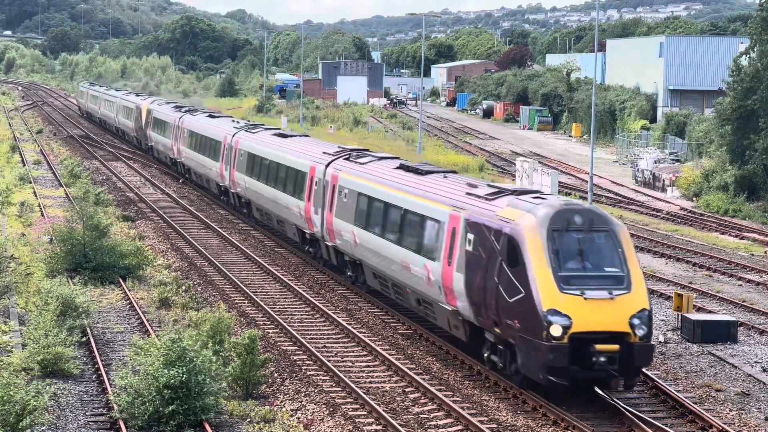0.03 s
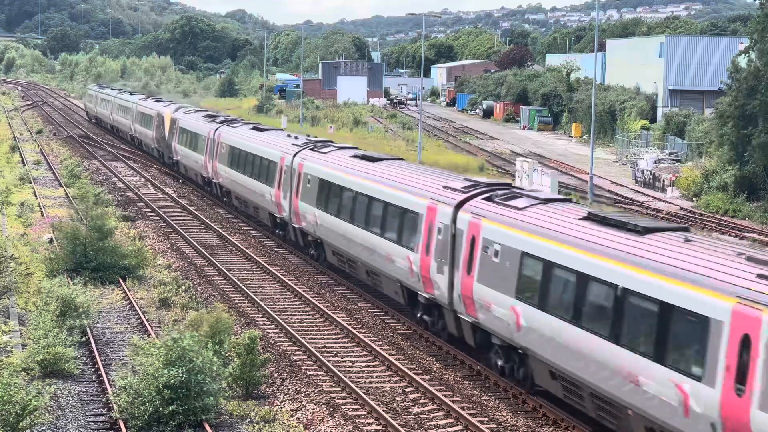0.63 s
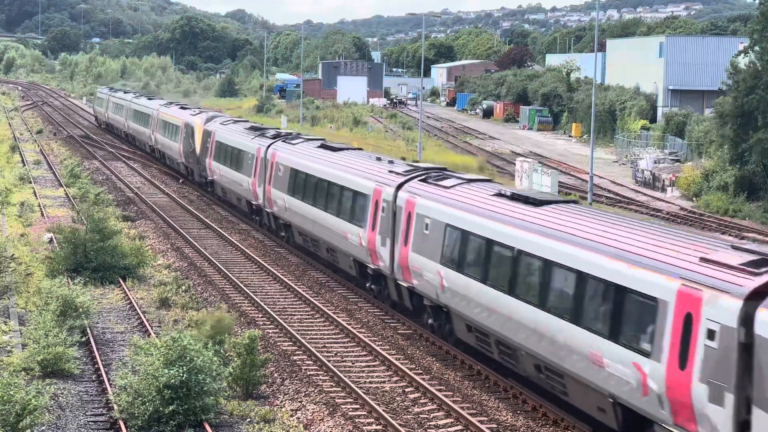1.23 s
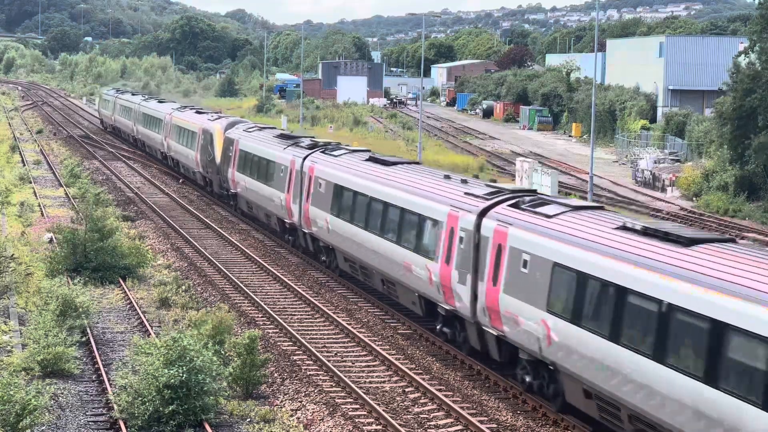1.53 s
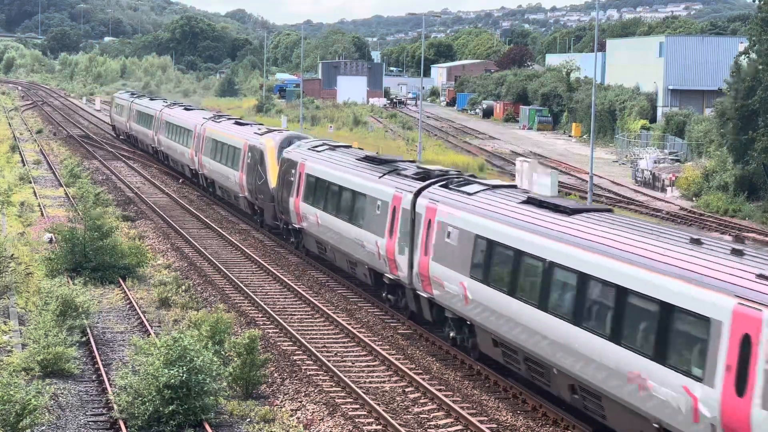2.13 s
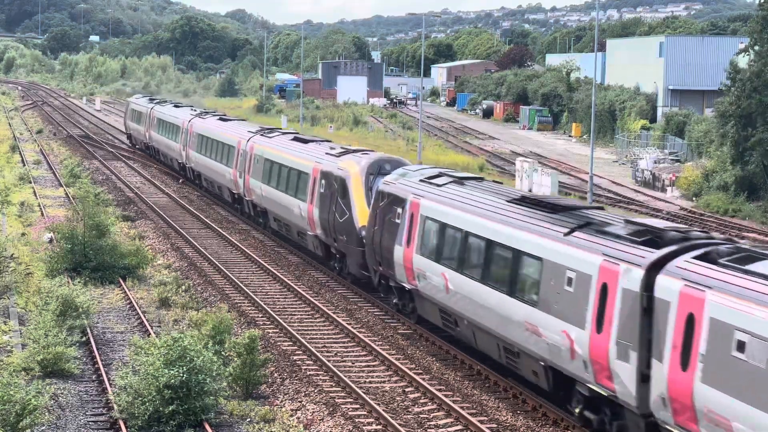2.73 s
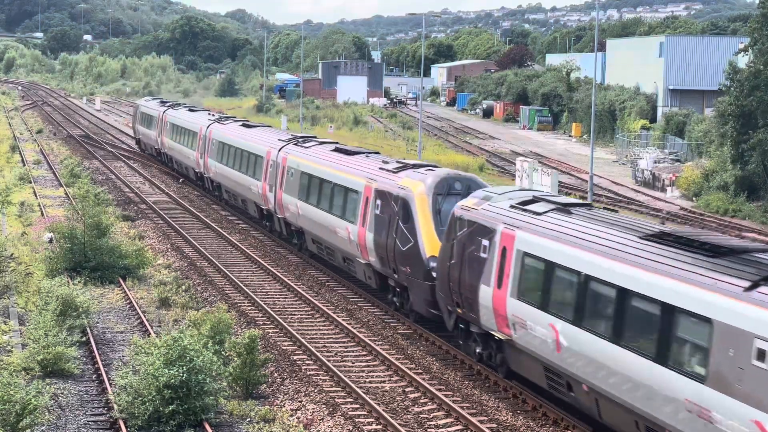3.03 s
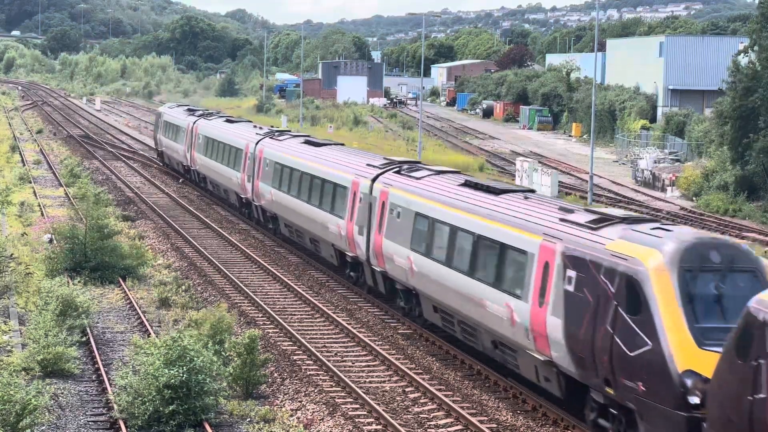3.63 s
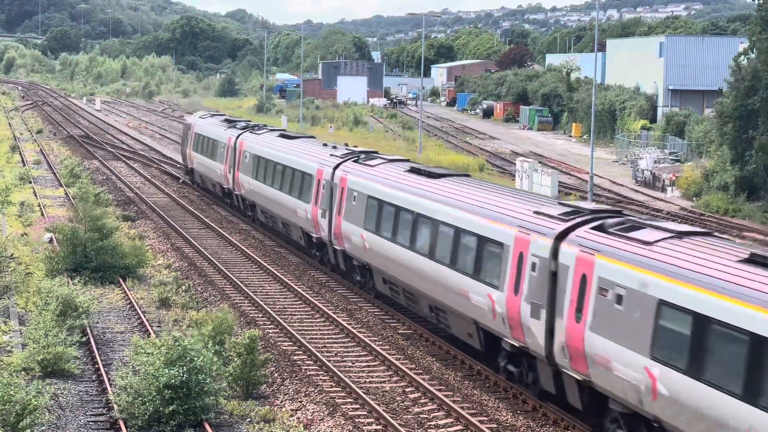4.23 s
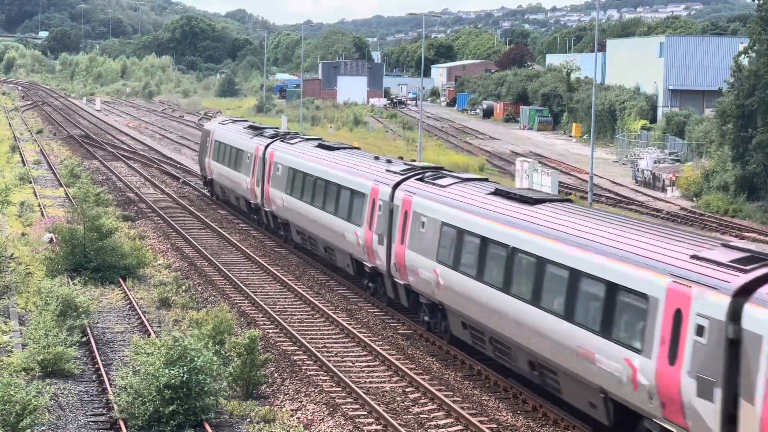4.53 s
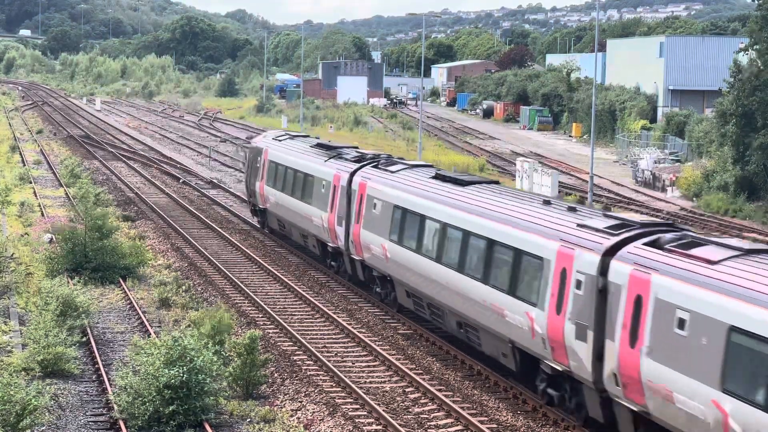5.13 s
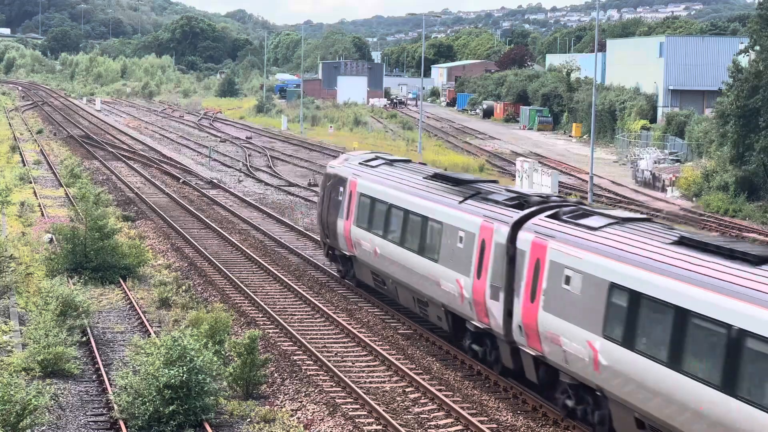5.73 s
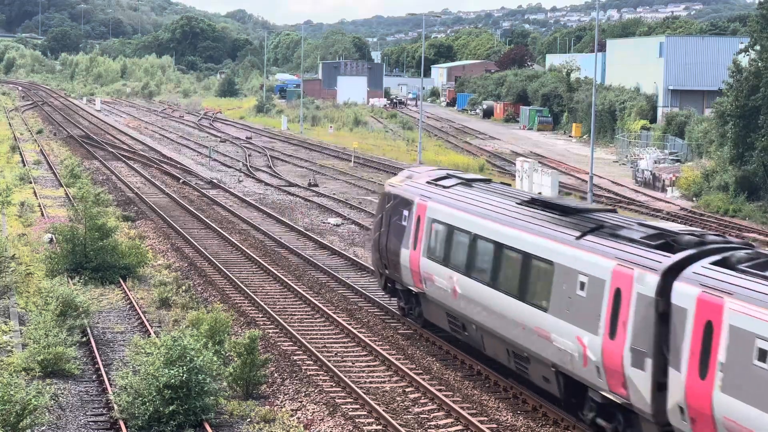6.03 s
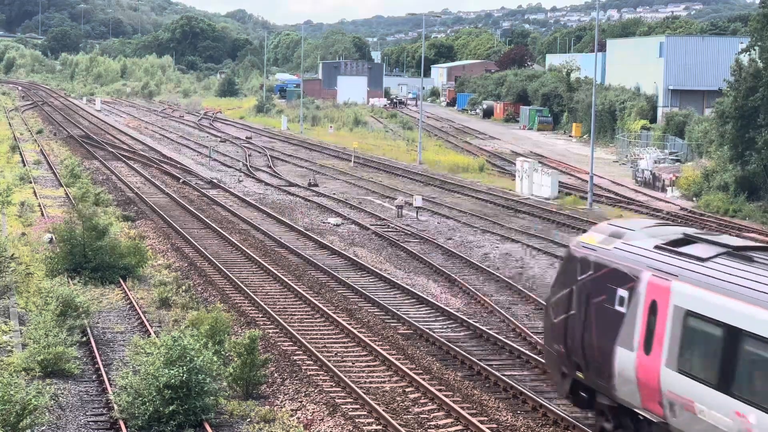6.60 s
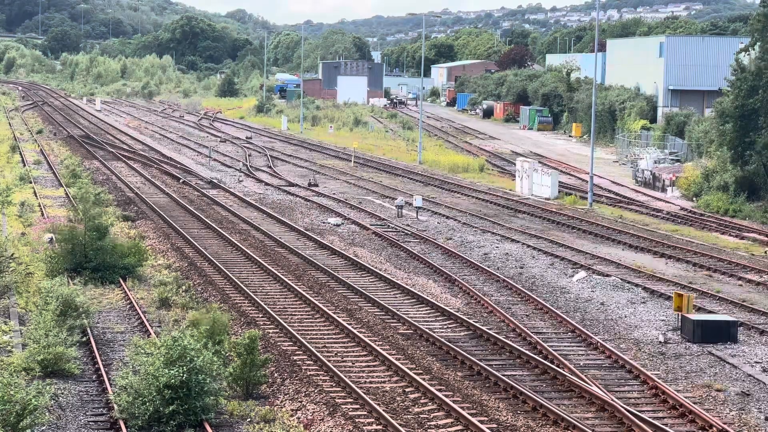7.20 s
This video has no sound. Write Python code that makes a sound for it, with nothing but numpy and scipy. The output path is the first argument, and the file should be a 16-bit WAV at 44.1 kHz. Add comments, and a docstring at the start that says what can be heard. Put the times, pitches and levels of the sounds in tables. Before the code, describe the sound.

A diesel passenger train passes at speed, heard outdoors close to the tracks. A rolling roar and low rumble build within the first half second, with a brief rush of air and a few heavy thuds. Wheels clack over gaps in the rails in quick groups, mostly of four, all the way through, hardest from about 1 to 2 seconds, where hollow booms sound under the cars. A low, throbbing engine drone swells around 1.8 seconds and returns in waves. From about 1.5 seconds, high turbocharger whistles come roughly every 0.8 seconds, each sinking in pitch, amid hissing air and faint, thin wheel squeals. At about 6.6 seconds a gust of hiss marks the tail of the train, and the last engine drops in pitch. The final knocks come just after 7 seconds as the roar and drone begin to fall away.

```python
"""Above a railway junction, a diesel train runs past at speed.
Rough wheels make the ground rumble and the cars and rails roar, while air hisses along the train.
Every car has an engine that drones and a turbocharger that whistles, sinking in pitch as it goes by.
Over it all, the axles knock across the gaps in the rails in quick groups, mostly of four."""
import sys
import numpy as np
from scipy.fft import rfft, irfft, next_fast_len
from scipy.io import wavfile
from scipy.ndimage import uniform_filter1d, minimum_filter1d

SR = 44100
rng = np.random.default_rng(int(sys.argv[2]) if len(sys.argv) > 2 else 0)


def wav_record(signal):
    """Record a signal, one row per channel, as 16-bit PCM in the file named by sys.argv[1]."""
    frames = np.transpose(np.atleast_2d(signal))
    bounded = np.clip(frames, -1, 1)
    # unit amplitude maps onto the largest positive 16-bit level
    quanta = np.round(bounded * 32767).astype(np.int16)
    wavfile.write(sys.argv[1], SR, quanta)


N = 324576
TIME = np.arange(N) / SR
SPEED_M_S, TRACK_DISTANCE_M, SOUND_M_S = 27.5, 19.0, 343

# rumble of the ground: t/s, level/dB
GROUND_LEVELS = [(0, -40), (0.26, -28), (0.5, -33), (1.1, -37.5), (1.62, -35), (2.2, -32), (2.45, -28),
                 (2.72, -34), (2.98, -23.5), (3.35, -31.5), (3.85, -30), (4.03, -27), (4.22, -29),
                 (4.7, -26.5), (5.35, -26), (5.85, -28.5), (6.05, -25), (6.3, -30), (6.7, -24), (6.9, -31),
                 (7.1, -26), (7.36, -32)]
# wheels rolling on the rails: t/s, car body level/dB, rail level/dB
ROLLING_LEVELS = [(0, -36.5, -36.5), (0.15, -20, -36), (0.3, -21.5, -31.5), (0.55, -23.5, -34.5),
                  (0.9, -19, -26.5), (1.15, -21.5, -28), (1.45, -19.5, -28), (1.95, -17.5, -26.5),
                  (2.25, -21, -30), (2.8, -19.5, -27.5), (3.15, -19.5, -31), (3.55, -20.5, -31),
                  (4.1, -21.5, -35), (4.35, -22, -33), (5.7, -22.5, -33), (6.05, -23.5, -31.5),
                  (6.95, -24, -33.5), (7.36, -27, -39.5)]
# tone colours (how strong each pitch is) of ground, car bodies and rails: f/Hz, level/dB
GROUND_COLOUR = [(25, -11), (34, -4), (48, 11), (70, 15), (100, 8.5), (140, 9), (250, -16)]
BODY_COLOUR = [(70, -12), (120, -3.5), (180, 3.5), (280, 0.5), (400, -3.5), (600, -13.5), (1200, -23)]
RAIL_COLOUR = [(300, -1), (500, 2.5), (800, 2.5), (1100, -1.5), (1450, -6), (1800, -6.5), (2200, -10),
               (3000, -13), (4500, -24.5), (8000, -53)]
# air along the cars: t/s, rush level/dB, high hiss level/dB
AIR_LEVELS = [(0, -56, -72), (0.3, -41.5, -70), (0.55, -47.5, -70), (0.92, -39, -64), (1.3, -39.5, -46),
              (1.55, -40, -48), (1.8, -36.5, -44), (2.3, -40, -45), (2.92, -37, -39), (3.35, -37.5, -45),
              (4.08, -46.5, -47), (4.3, -43.5, -54), (4.9, -41.5, -52), (5.7, -41, -49), (6.1, -35.5, -42),
              (6.55, -39.5, -49), (6.8, -40, -52), (7.36, -48, -55)]
# gusts at the nose, joined cabs and tail: peak t/s, rush level/dB, high hiss level/dB, build-up/s
GUSTS = [(0.32, -36.5, -57, 0.034), (3.38, -44, -39, 0.55), (6.62, -32.5, -37.5, 0.45)]
# tone colours of the rush and the high hiss: f/Hz, level/dB
RUSH_COLOUR = [(2000, 1.5), (3500, 1), (5000, 1), (6200, 1.5), (8200, 2.5), (9800, -25), (11200, 0.5),
               (12500, -10)]
HISS_COLOUR = [(7500, -14), (9500, -4), (10200, -8), (11300, 0), (12200, -2), (13000, -4), (15700, -5)]
# hollow booms of the frames under the cars: peak t/s, swell/s, f/Hz, width/Hz, level/dB
BOOMS = [(0.9, 0.08, 245, 22, -24), (1.1, 0.08, 285, 16, -21.5), (1.09, 0.12, 365, 24, -22.5),
         (1.55, 0.65, 470, 30, -27.5), (1.75, 0.3, 305, 22, -26.5), (5.05, 0.12, 365, 25, -25)]
# thin wheel squeals: t/s, f/Hz, level/dB
SQUEALS = [(1.05, 15000, -56), (1.28, 14700, -53), (1.41, 14250, -51), (1.97, 14250, -54),
           (2.2, 14300, -54), (3.62, 14200, -57), (3.86, 14200, -54), (4.7, 13880, -51), (4.9, 13350, -54),
           (5.18, 14110, -55)]
# exhaust of the oncoming engines and the last one: t/s, firing f/Hz, base level/dB, octave level/dB
ONCOMING_ENGINES = [(0, 94.2, -30, -34), (0.62, 96, -38.5, -48), (1.2, 97.3, -28, -33),
                    (1.55, 98.5, -50, -23), (1.82, 97.8, -17.5, -13), (2.1, 95, -35, -24.5),
                    (2.5, 95.8, -20.5, -17), (2.75, 95, -21, -30), (3.05, 94.5, -33, -25),
                    (3.33, 95.8, -14, -28), (3.87, 95.4, -19.5, -16), (4.15, 96.7, -33, -26),
                    (4.75, 94.5, -25, -43), (5.1, 95.7, -24, -37), (5.8, 94.6, -21, -29),
                    (6.25, 95.53, -32, -34), (7.1, 94.5, -18, -23.5), (7.36, 93.1, -39, -26)]
LAST_ENGINE = [(6.0, 94.5, -72, -70), (6.5, 91.2, -18.5, -29), (6.8, 86.1, -20, -15.5),
               (7.0, 84.8, -29, -28), (7.36, 82.85, -48, -40)]
# passing cars: turbo peak t/s, engine level/dB, turbo f/Hz at rest, turbo level/dB, approach/s
CARS = [(1.602, -28.5, 7800, -29.5, 0.31), (2.36, -37, 7740, -32.5, 0.22), (3.22, -29, 7960, -29, 0.42),
        (3.981, -36, 7920, -35, 0.31), (4.92, -36, 8560, -29.5, 0.43), (5.7, -44, 8250, -32.5, 0.36),
        (6.5, -28.5, 7838, -38, 0.57), (7.2, -37, 8720, -35.5, 0.46)]
# bumps of loose sleepers, the beams under the rails: t/s, f/Hz, level/dB
SLEEPER_BUMPS = [(0.22, 200, -4), (0.595, 220, -10), (1.186, 420, -6), (1.436, 230, -7), (1.617, 280, -7),
                 (2.009, 330, -7), (2.092, 230, -8), (2.182, 480, -11), (2.256, 380, -10), (2.445, 240, -7),
                 (3.911, 130, -7), (4.278, 220, -10), (4.658, 140, -8), (4.837, 240, -11), (4.94, 190, -6),
                 (4.964, 150, -7), (5.006, 250, -10), (5.319, 170, -8), (5.464, 170, -8), (5.622, 200, -9),
                 (6.738, 130, -6), (7.005, 260, -8), (7.116, 130, -5), (7.275, 230, -13)]
# notes of a bogie, the frame that holds the wheels: f/Hz, level/dB, time to fade by 60 dB/s
BOGIE_NOTES = [(215, -1, .2), (270, -1, .18), (370, -6, .13), (470, -1, .15), (620, -4, .1), (900, -2, .06),
               (1230, -2, .045)]
# axles hitting the gaps: t/s, clack level/dB, thud level/dB, crack level/dB
AXLE_HITS = [(0.072, -16.5, -18, -30.5), (0.152, -19.5, -20, -33.5), (0.204, -17, -11, -30),
             (0.2135, -13, -9, -20.5), (0.291, -28, -21, -31), (0.301, -26, -8, -31),
             (0.317, -23, -19, -32), (0.355, -19.5, -17, -30), (0.606, -28, -14.5, -29.5),
             (0.668, -19.5, -27, -36), (0.797, -19.5, -16.5, -32), (0.872, -29, -15, -31),
             (0.93, -18.5, -12, -27.5), (1.045, -19, -13.5, -29.5), (1.125, -14.5, -8, -29),
             (1.153, -10.5, -18, -22.5), (1.235, -7.5, -14, -21), (1.314, -14.5, -17, -23),
             (1.397, -14, -16, -25), (1.496, -22, -32, -36), (1.73, -11.5, -16, -27),
             (1.754, -17, -24, -35), (1.808, -13.5, -14, -28), (1.889, -17.5, -14, -30),
             (1.981, -15, -16, -27), (2.058, -13.5, -33, -24), (2.137, -17.5, -12.5, -27),
             (2.22, -16, -22, -25.5), (2.382, -22, -26, -41), (2.548, -14, -16, -33),
             (2.626, -15.5, -21, -24.5), (2.706, -20, -13, -26), (2.789, -14, -13, -24),
             (2.875, -17.5, -35, -29), (2.954, -19, -17, -27.5), (3.035, -17, -16, -27),
             (3.364, -14.5, -11, -26.5), (3.44, -16, -26, -28), (3.519, -19, -14, -34),
             (3.602, -13, -11, -25), (3.687, -17.5, -28, -27), (3.772, -19.5, -19, -32),
             (3.848, -21.5, -17, -28.5), (4.17, -19, -34, -30), (4.249, -19.5, -30, -31),
             (4.327, -17, -16, -32), (4.41, -19, -23, -29), (4.474, -18, -13.5, -31),
             (4.502, -23, -22, -34), (4.554, -18.5, -35, -29.5), (4.633, -19, -14, -29.5),
             (4.711, -18, -23, -30), (5.034, -16, -17, -32), (5.116, -20.5, -21, -34),
             (5.19, -22, -15, -32.0), (5.277, -13, -24, -24.5), (5.309, -26, -23, -35),
             (5.353, -18, -23, -27.5), (5.43, -20.5, -17, -29), (5.512, -20, -19, -32),
             (5.828, -16.5, -19, -27), (5.911, -19, -28, -28.5), (5.984, -22, -16, -31),
             (6.042, -28, -6, -32), (6.065, -15.5, -12.5, -25.5), (6.149, -20.5, -18, -30),
             (6.226, -18, -19, -31), (6.305, -21.5, -15, -29.5), (6.625, -19, -17, -33),
             (6.699, -18, -19, -29.5), (6.775, -20.5, -29, -34), (6.855, -17.5, -19, -36),
             (6.864, -17, -14, -26), (6.94, -20, -19, -31), (7.015, -18.5, -16.5, -29),
             (7.093, -20, -13.5, -31), (7.103, -19, -15, -32), (7.271, -33, -28, -34)]
# tone colours of the three parts of a knock: f/Hz, level/dB
CLACK_COLOUR = [(150, -45), (340, -5), (470, 3), (620, 1.5), (900, 0.5), (1300, -11.5), (2000, -42)]
THUD_COLOUR = [(80, -37), (150, 3.5), (240, 6), (380, -4.5), (600, -8.5), (1500, -41)]
CRACK_COLOUR = [(700, -27), (1400, 10.5), (2000, 6), (2800, 2), (4000, -4.5), (7000, -13.5), (14000, -31)]
# sound scattered to the sides: f/Hz, level/dB
SCATTER_COLOUR = [(60, -12), (250, -11), (500, -7.5), (1000, -4.5), (1500, -10), (2200, -24), (3200, -20),
                  (4500, -36), (6500, -45), (8200, -16), (12000, -15), (15000, -7)]
# how far the left side runs ahead of the right: f/Hz, phase/rad
LEFT_LEAD = [(60, 0), (340, -.5), (600, -1.3), (800, -1.95), (1050, -1.95), (1400, -1), (2050, 0),
             (7400, 0), (7700, -.6), (8600, -1), (9400, -2.8), (10200, -3.2), (10900, -3.7), (11400, -4.5),
             (12200, -5.2), (12600, -6.28), (14300, -6.28), (15700, -8.8)]
# how much louder the left side is than the right: f/Hz, level/dB
LEFT_BALANCE = [(250, 0), (400, -1), (550, -3.2), (850, -2.8), (1100, 0), (1450, 2), (2000, 0)]


def from_db(db):
    """Turn decibels into a factor to multiply by."""
    return 10 ** (np.asarray(db) / 20)


def rms_one(x):
    """Scale a sound to an average power of one."""
    return x / np.sqrt(np.mean(x ** 2) + 1e-20)


def in_time(rows):
    """Join a table's points in time, giving one curve per column."""
    times, *columns = np.transpose(rows)
    return [np.interp(TIME, times, column) for column in columns]


def at_hz(points, hz):
    """Read a table at any frequency, with octaves evenly spaced."""
    f, value = np.transpose(points)
    return np.interp(np.log(np.maximum(hz, 1)), np.log(f), value)


def shaped(x, gain_at):
    """Filter a sound: multiply each frequency f by gain_at(f)."""
    size = next_fast_len(x.shape[-1] + 2048)
    hz = np.arange(size // 2 + 1) * SR / size
    return irfft(rfft(x, size) * gain_at(hz), size)[..., :x.shape[-1]]


def coloured(x, colour):
    """Give noise a tone colour that fades beyond the table's ends."""
    low, high = colour[0][0], colour[-1][0]
    return shaped(x, lambda f: from_db(at_hz(colour, f)) * np.minimum(f / low, high / (f + 1)).clip(max=1) ** 2)


def drift(rate_hz):
    """A random wobble, about one in size and mostly slower than rate_hz."""
    return rms_one(shaped(rng.standard_normal(N), lambda f: 1 / (1 + (f / rate_hz) ** 4)))


def spread(direct, scattered):
    """Make stereo: add the scattered sound on the left, subtract it on the right."""
    side = shaped(scattered, lambda f: from_db(at_hz(SCATTER_COLOUR, f)))
    return direct + side * np.array([[1], [-1]])


def noise(colour):
    """Stereo noise with a tone colour."""
    return rms_one(spread(*coloured(rng.standard_normal((2, N)), colour)))


def steadied(x, window_s):
    """Even out a noise's slow swings and keep its grain."""
    power = np.mean(np.atleast_2d(x) ** 2, axis=0)
    return x / np.sqrt(uniform_filter1d(power, size=int(window_s * SR)) + 1e-6)


def swell(at_s, length_s):
    """A smooth rise and fall."""
    return np.exp(-((TIME - at_s) / length_s) ** 2)


def running_phase(hz):
    """The angle a wave has turned through as its pitch moves."""
    return 2 * np.pi * (np.cumsum(hz) / SR + rng.random())


def whistle(hz, width_hz):
    """A breathy tone: a narrow band of noise around a pitch."""
    wobble = shaped(rng.standard_normal((2, N)), lambda f: 1 / (1 + (f / width_hz) ** 3))
    phase = running_phase(hz * np.ones(N))
    return rms_one(wobble[0] * np.cos(phase) + wobble[1] * np.sin(phase))


def struck(hz, t60):
    """A short struck note that fades by 60 dB in t60 seconds."""
    t = np.arange(SR // 4) / SR
    return np.sin(2 * np.pi * hz * t) * from_db(-60 * t / t60)


def rolling():
    """Rough wheels shake the ground, the car bodies and the rails together."""
    body_db, rail_db = in_time(ROLLING_LEVELS)
    ground_db, = in_time(GROUND_LEVELS)
    judder = drift(26)  # shared by bodies and rails
    ground = from_db(ground_db + 4.5 + 1.8 * drift(10)) * steadied(noise(GROUND_COLOUR), .13)
    bodies = from_db(body_db + .67) * steadied(from_db(2 * judder) * noise(BODY_COLOUR), .13)
    grit_db = .86 * (1.1 * judder + .37 * drift(110))
    rails = from_db(rail_db + 5 + grit_db) * noise(RAIL_COLOUR)
    return ground + bodies + rails


def rushing_air(release_s=.089):
    """Air hisses along the cars; a gust builds before each cab and drops away behind it."""
    rush_db, hiss_db = in_time(AIR_LEVELS)
    rush, hiss = from_db(rush_db + 3.5), from_db(hiss_db - 4)
    for s, gust_rush_db, gust_hiss_db, build_s in GUSTS:
        gust = swell(s, np.where(TIME < s, build_s, release_s))
        rush = np.hypot(rush, from_db(gust_rush_db) * gust)
        hiss = np.hypot(hiss, from_db(gust_hiss_db) * gust)
    flutter = from_db(.7 * drift(11))
    return flutter * (rush * noise(RUSH_COLOUR) + hiss * noise(HISS_COLOUR))


def spit():
    """One short, high spit of hiss from a passing car."""
    return from_db(-41) * swell(at_s=4.843, length_s=.022) * whistle(hz=12400, width_hz=1200)


def singing_steel(sink_hz_per_s=2500):
    """The track growls under the first car, the rails ring, and wheels scrape and squeal."""
    growl = from_db(-22) * swell(at_s=.95, length_s=.25) * whistle(hz=337, width_hz=210)
    ring = from_db(-42) * swell(at_s=2.2, length_s=1.6) * whistle(hz=1756, width_hz=40)
    scrape = from_db(-42) * swell(at_s=2.84, length_s=.32) * whistle(hz=5730, width_hz=530)
    rows = np.array(SQUEALS)
    midpoints_s = (rows[1:, 0] + rows[:-1, 0]) / 2
    s, hz, db = rows[np.searchsorted(midpoints_s, TIME)].T  # the squeal nearest in time
    sinking_hz = hz - sink_hz_per_s * (TIME - s)
    squeal = from_db(db) * swell(s, length_s=.097) * whistle(sinking_hz, width_hz=130) / np.sqrt(3)
    return growl + ring + scrape + squeal


def hollow_frames(sag_per_s=.08):
    """The frames under the cars boom, each boom sinking a little in pitch."""
    out = 0
    for s, length_s, hz, width_hz, db in BOOMS:
        boom = whistle(hz * (1 - sag_per_s * (TIME - s)), width_hz)
        out += from_db(db) * swell(s, length_s) * steadied(boom, .1)
    return out


def engine_drone(curve, throb_db=2.6, sway_db=1.8):
    """Exhaust puffs merge into a low note that throbs and wavers."""
    hz, base_db, octave_db = in_time(curve)
    phase = running_phase(hz * (1 + .02 * drift(14.5)))
    out = 0
    for harmonic, db in ((1, base_db - 4), (2, octave_db - 7), (3, octave_db - 17)):
        out += from_db(db + throb_db * drift(61) + sway_db * drift(7.6)) * np.sin(harmonic * phase)
    return np.sqrt(2) * out


def passing_cars(firing_hz=92.26, lead_s=.3, leave_s=.28):
    """Each engine and turbocharger swells, drops in pitch as it passes (Doppler effect) and fades."""
    flicker = from_db(1.3 * drift(24))
    waver = 1 + .005 * drift(13.94)
    out = 0
    for s, engine_db, turbo_hz, turbo_db, approach_s in CARS:
        ahead_m = SPEED_M_S * (s + lead_s - TIME)  # the turbo peaks before the car is closest
        closing_m_s = SPEED_M_S * ahead_m / np.hypot(ahead_m, TRACK_DISTANCE_M)
        doppler = 1 / (1 - closing_m_s / SOUND_M_S)
        width_s = np.where(TIME < s, approach_s, leave_s)
        nearness = swell(s, 2.3) / (1 + ((TIME - s) / width_s) ** 2)  # high sounds do not carry far
        tone = whistle(turbo_hz * doppler * waver, width_hz=140)
        hiss = from_db(5.5) * whistle(turbo_hz * 1.025 * doppler ** .3, width_hz=644)  # glides less
        out += from_db(turbo_db - 6.5) * nearness * flicker * (tone + hiss)
        firing = running_phase(firing_hz * doppler)
        exhaust = sum(from_db(-3.5 * k) * np.sin((k + 1) * firing) for k in range(3))
        out += from_db(engine_db) * exhaust / (1 + (ahead_m / TRACK_DISTANCE_M) ** 2)
    return out


def loose_sleepers(ring_cycles=9.1):
    """Loose sleepers drop back on the stones, each with a dull bump."""
    out = np.zeros(N + SR)
    for s, hz, db in SLEEPER_BUMPS:
        at = int(s * SR)
        bump = from_db(db) * struck(hz, ring_cycles / hz)
        out[at:at + len(bump)] -= bump
    return out[:N]


def ringing_bogies(ring_db=-9.5, detune=.05, uneven_db=2.5):
    """Every clack leaves a wheel frame ringing; no two are tuned quite alike."""
    out = np.zeros(N + SR)
    for s, clack_db, _, _ in AXLE_HITS:
        at = int(s * SR)
        for hz, db, t60 in BOGIE_NOTES:
            tuning, strength = rng.standard_normal(2)
            note = np.sign(tuning) * struck(hz * (1 + detune * tuning), t60)
            out[at:at + len(note)] += from_db(clack_db + ring_db + db + uneven_db * strength) * note
    return out[:N]


def contact(age_s, rise_s, t60):
    """Loudness rises as the wheel rolls into the gap, then dies away."""
    age_s = np.maximum(age_s, 0)
    return (1 - np.exp(-(age_s / rise_s) ** 2)) * from_db(-60 * age_s / t60)


def strikes(column, colour, gain_db, rise_s, t60, tail_t60, early_s):
    """One part of every knock: a rough burst of ringing as the wheel hits the gap."""
    lead_s = .04  # room for the nudge before the blow
    t = np.arange(SR // 4) / SR - lead_s
    first_20_ms = (t > 0) & (t < .02)
    out = np.zeros((2, N + len(t)))
    chatter = np.resize(from_db(1.5 * drift(256)), N + len(t))  # the wheel's rim chatters
    rings = coloured(rng.standard_normal((len(AXLE_HITS), 2, len(t))), colour)
    variations = np.exp(.25 * rng.standard_normal((len(AXLE_HITS), 4)))  # no two blows are alike
    for hit, ring, (softness, length, lateness, tint) in zip(AXLE_HITS, rings, variations):
        at = max(round((hit[0] - early_s - lead_s) * SR), 0)
        onset_s = rise_s * softness
        nudge = from_db(-20.5) * contact(t + .0216, onset_s, t60)  # the wheel loads the sleeper
        blow = contact(t, onset_s, t60 * length)
        rebound = from_db(-14) * contact(t - .0308 * lateness, onset_s, t60)  # it lands once more
        tail = from_db(-17.5) * contact(t, onset_s, tail_t60)  # scatter from the stones
        delay = int(.002 * tint ** 2 * SR)
        ring = ring - .4 * np.roll(ring, delay, axis=1)  # gives each wheel its own colour
        burst = ring * (nudge + blow + rebound + tail) * chatter[at:at + len(t)]
        burst /= np.std(burst[:, first_20_ms], axis=1, keepdims=True)
        out[:, at:at + len(t)] += from_db(hit[column] + gain_db) * burst
    return out[:, :N]


def axle_knocks():
    """Each axle gives a hard clack, a thud of the sleepers and a bright crack of steel."""
    clack = strikes(1, CLACK_COLOUR, gain_db=-1.5, rise_s=.0015, t60=.048, tail_t60=.27, early_s=.00195)
    thud = strikes(2, THUD_COLOUR, gain_db=-3.5, rise_s=.0042, t60=.07, tail_t60=.18, early_s=.00094)
    crack = strikes(3, CRACK_COLOUR, gain_db=-2, rise_s=.003, t60=.05, tail_t60=.3, early_s=.003)
    direct, scattered = clack + thud + crack
    return spread(direct, from_db(-10) * scattered)


def scene():
    """The whole train: wheels on the track, air and engines."""
    knocks = axle_knocks() + ringing_bogies() + loose_sleepers()
    roar = rolling() + hollow_frames() + singing_steel()
    air = rushing_air()
    engines = engine_drone(ONCOMING_ENGINES) + engine_drone(LAST_ENGINE) + passing_cars()
    return knocks + roar + air + engines + spit()


def record(dry):
    """Set left and right apart in phase and level, hold down peaks and cut the highest treble."""
    ceiling, cutoff_hz = .93, 15700
    sides = np.array([[.5], [-.5]])
    stereo = shaped(dry, lambda f: from_db(sides * at_hz(LEFT_BALANCE, f))
                    * np.exp(1j * sides * at_hz(LEFT_LEAD, f)))
    gain = np.minimum(1, ceiling / (np.abs(stereo).max(axis=0) + 1e-9))
    gain = uniform_filter1d(minimum_filter1d(gain, size=201), size=201)  # dips briefly around a peak
    return shaped(stereo * gain, lambda f: np.clip((cutoff_hz - f) / 100 + 1, 0, 1))


dry = scene()
out = record(dry)
wav_record(out)
```